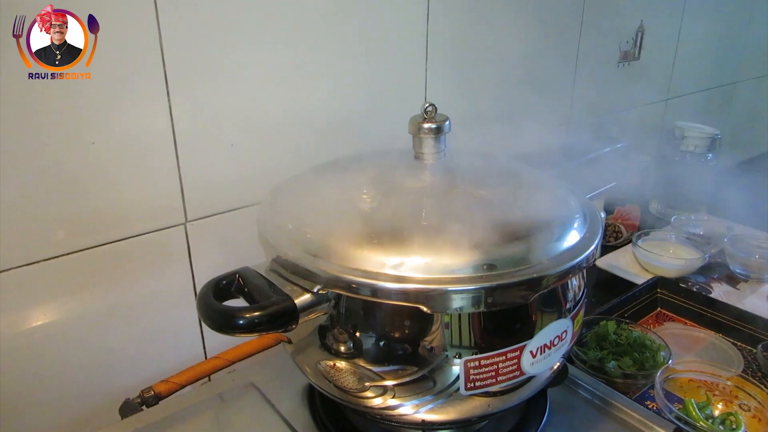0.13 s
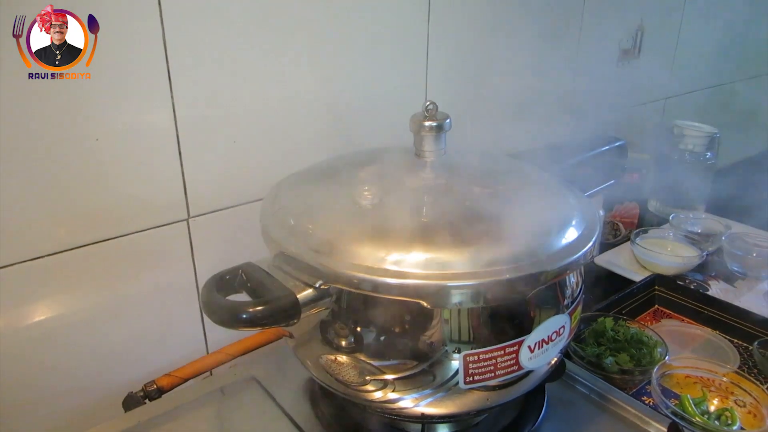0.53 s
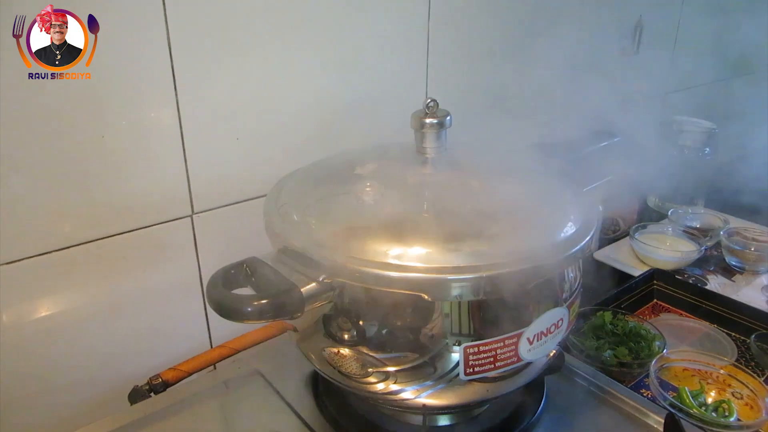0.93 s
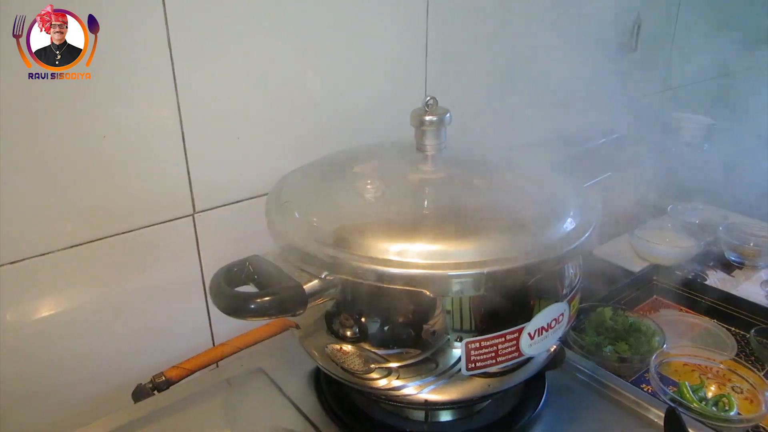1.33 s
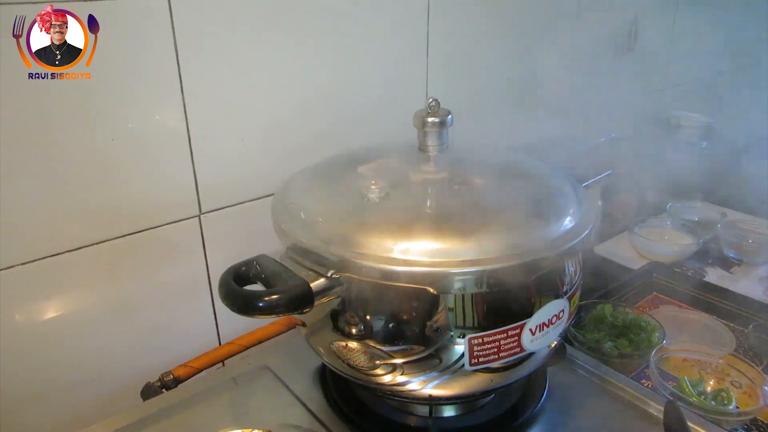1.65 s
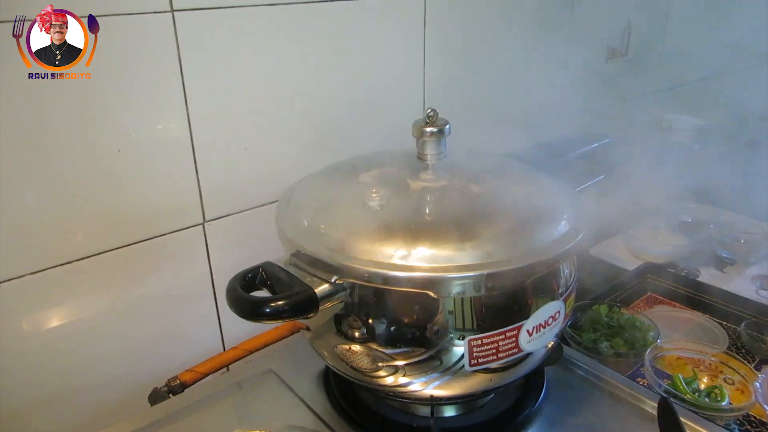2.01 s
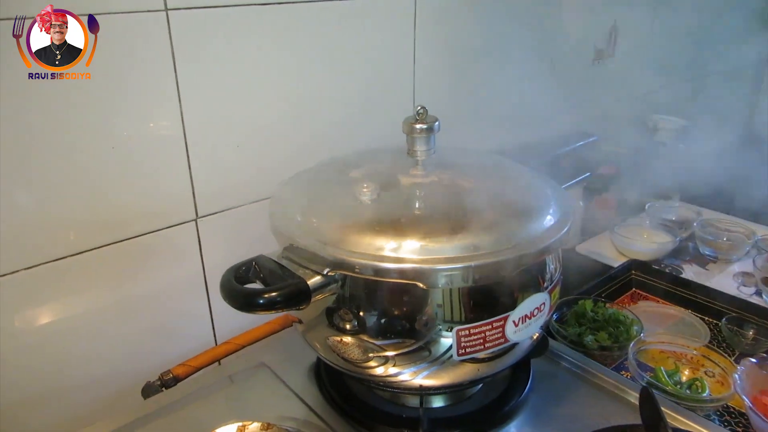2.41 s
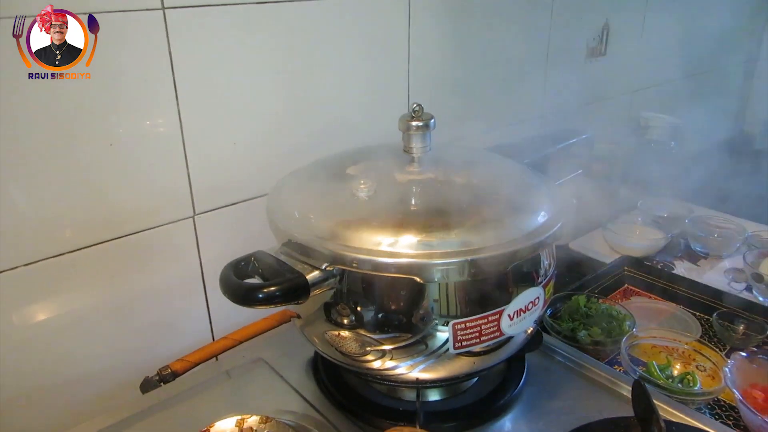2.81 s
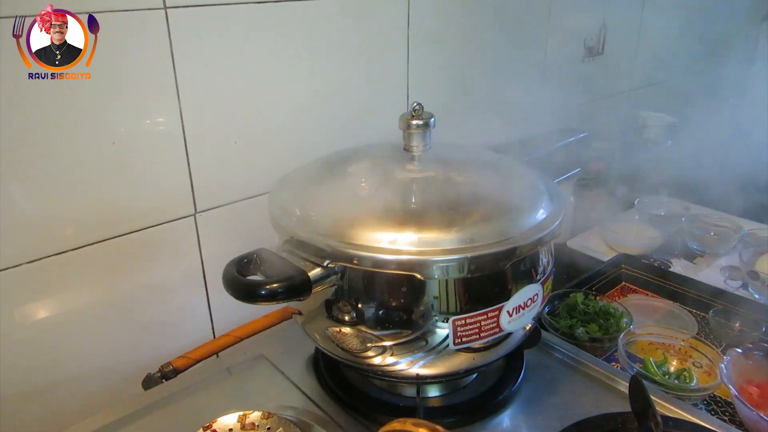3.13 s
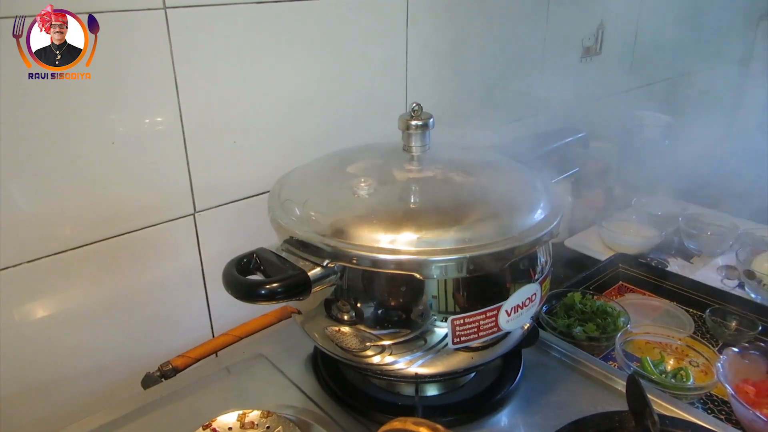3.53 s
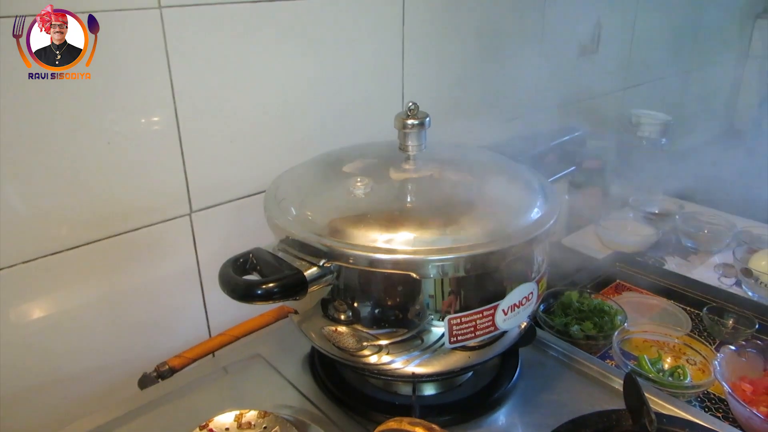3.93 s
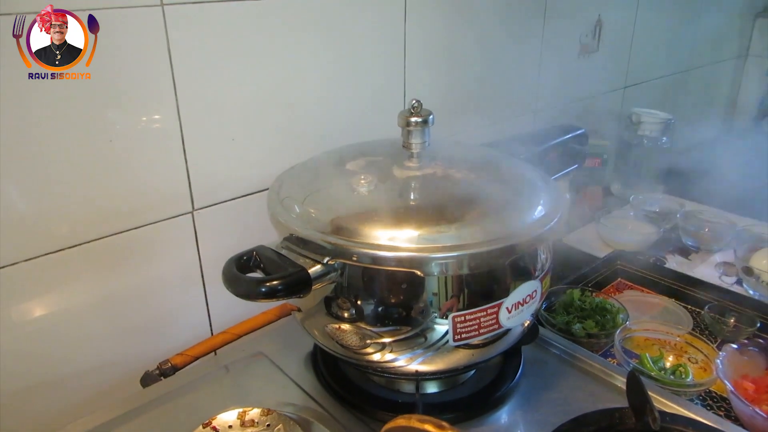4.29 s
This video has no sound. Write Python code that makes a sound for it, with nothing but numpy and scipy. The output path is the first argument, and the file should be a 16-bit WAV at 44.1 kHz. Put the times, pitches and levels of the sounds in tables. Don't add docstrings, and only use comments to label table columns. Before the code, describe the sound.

A pressure cooker vents loud, breathing steam while its low roar calms; early on, a brief harsh scrape overloads the microphone.

```python
import sys
import numpy as np
from scipy import signal
from scipy.fft import rfft, irfft
from scipy.io import wavfile
from scipy.ndimage import uniform_filter1d, minimum_filter1d

SR = 44100
rng = np.random.default_rng(int(sys.argv[2]) if len(sys.argv) > 2 else 0)


def volts_from_db(level):
    exponent = np.asarray(level, float) / 20
    return 10 ** exponent


def pcm_store(signal):
    levels = np.round(np.clip(np.atleast_2d(signal), -1, 1) * 32767)
    wavfile.write(sys.argv[1], SR, levels.astype(np.int16).T)


N = 196669

# frequency in Hz, level in dB per Hz.
JET_COLOUR = [(20, -69), (40, -25), (140, -46), (310, -30), (500, -31), (870, -20), (1360, -18),
              (2180, -12.5), (4650, -5), (6890, -0.5), (10000, -1), (12000, -6.5), (14000, -7.5),
              (15700, -19.5)]
# frequency in Hz, port difference over the sum in dB.
PORT_WIDTH = [(60, -2), (380, -1), (700, -8.5), (1290, -18.5), (2380, -15.5), (4400, -14), (6500, -12),
              (7500, -13)]
# frequency in Hz, width in Hz, lift in dB.
RESONANCES = [(1100, 213, 7.5), (685, 26, 6.5), (2980, 310, -1), (3390, 870, 2.5), (5850, 160, 2.5),
              (6900, 1000, 1.5), (9770, 160, -0.5), (10740, 280, 2.5)]
# time in seconds, chatter pitch in Hz, level in dB.
SCRAPE_PATH = [
    (0.5066, 2302, -5.5),
    (.525, 2400, -8),
    (.535, 1600, -6),
    (0.561, 1603, -6),
    (0.573, 1453, -3.5),
    (0.591, 1648, -3.5),
    (0.622, 1401, -5),
    (0.6337, 744, -2),
]
# time in seconds, length in seconds.
CONTACT_LIFTS = [ (.5142, .0012), (.522, .002), (.5292, .0016), (.557, .002), (.5635, .001), (.5748, .0014),
                 (.5845, .002), (.6078, .004), (.6172, .0012), (.6285, .0016), (.6318, .001)]
# frequency in Hz, level in dB per Hz.
RUB_COLOUR = [(30, -54), (110, -12), (200, -3), (400, -0.5), (700, 6.5), (1500, 5.5), (3000, -15),
              (5000, -10), (9000, -50)]
# time in seconds, length in seconds, jet change in dB.
WEIGHT_MOVES = [(0.417, 0.21, 4), (0.676, 0.54, 0), (1.016, 0.12, -5), (1.183, 0.043, -1.5),
                (1.434, 0.25, -1), (1.565, 0.14, -6), (1.74, 0.085, 1.5), (1.92, 0.13, -6.5),
                (2.042, 0.16, -4), (2.25, 0.17, 1), (2.552, 0.12, -4), (2.773, 0.035, -4.5),
                (2.943, 0.11, -3), (3.113, 0.49, 1.5), (3.593, 0.19, -4), (4.003, 0.18, -0.5),
                (4.239, 0.093, -4), (4.377, 0.082, 2)]
# time in seconds, roar level in dB.
BOIL_ROAR = [(0, 6.5), (.3, 8), (.42, 4), (.72, 10), (.93, -1.5), (1.4, -0.5), (2.2, -2), (2.85, 2.5),
             (3.2, -2.5), (3.9, -1.5), (4.46, -0.5)]

STEAM_DB = -18
BACKUP = 0.78
SWITCHING_HZ = 7580
TOP_HZ = 4600
SNAP = 3.2
GRIP_DB = 0.9
FFT, HOP = 512, 128


def evened(x):
    return x / np.sqrt(np.mean(x ** 2) + 1e-20)


def read(points, hz):
    f, value = np.transpose(points)
    return np.interp(np.log(hz + 1), np.log(f + 1), value)


def drift(length, hz):
    r = np.exp(-2 * np.pi * hz / SR)
    return evened(signal.lfilter([1], [1, -2 * r, r * r], rng.standard_normal(length)))


def kitchen_noise(frames):
    t = np.arange(SR // 4) / SR
    echoes = rng.standard_normal((2, len(t))) * volts_from_db(-60 * t / 0.25)
    echoes /= np.linalg.norm(echoes, axis=1, keepdims=True)
    echoes[:, 0] = volts_from_db(8)
    source = rng.standard_normal((2, frames * HOP + len(t)))
    noise = signal.fftconvolve(source, echoes, "valid", axes=1)
    spectra = signal.stft(noise, nperseg=FFT, noverlap=FFT - HOP, boundary="even")[2]
    return spectra[..., :frames]


def polarity(frames, hz):
    blocks = rng.standard_normal((frames // 8 + 2, len(hz) // 8 + 1)).T
    blocks = evened(blocks + 0.8 * np.roll(blocks, 1, axis=1) + 0.55 * np.roll(blocks, 1, axis=0))
    lean = np.interp(hz[::8], [7550, 11560, 12870, 15500], [-0.61, 0.18, 1.0, 1.0])[:, None]
    flips = np.tanh(8.6 * (blocks + lean))
    flips = flips.repeat(8, axis=0).repeat(8, axis=1)
    return 23.7 * uniform_filter1d(flips[:len(hz), :frames], size=3, axis=1)


def chatter_pitch(t):
    s, hz, _ = np.transpose(SCRAPE_PATH)
    pitch = np.interp(t, s, hz) * np.exp(0.9 * np.tanh(0.7 * drift(len(t), hz=700)))
    for at, length in CONTACT_LIFTS[:-2]:
        since = t - at - length / 2
        pitch *= 1 + 0.9 * (since > 0) * np.exp(-abs(since) / 0.0012)
    return TOP_HZ * np.tanh(pitch / TOP_HZ)


def release_thump(end):
    after = np.maximum(np.arange(N) / SR - end, 0)
    onset = np.minimum(after / 0.0006, 1)
    return -volts_from_db(-16.5) * onset * (np.exp(-after / 0.005) - 0.35 * np.exp(-after / 0.022))


def scrape():
    s, _, level_db = np.transpose(SCRAPE_PATH)
    t = np.arange(s[0], s[-1], 1 / SR)
    turns = 2 * np.pi * np.cumsum(chatter_pitch(t)) / SR
    pointed = np.arcsin(0.97 * np.sin(turns))

    rub_gain = volts_from_db(read(RUB_COLOUR, np.fft.rfftfreq(len(t), 1 / SR)))
    rub = irfft(rfft(rng.standard_normal(len(t))) * rub_gain, len(t))
    drive = pointed + volts_from_db(-10) * evened(rub)

    swing = np.tanh(0.24 * drive)
    swing = swing + SNAP * np.gradient(swing * abs(swing))
    swing *= volts_from_db(GRIP_DB * drift(len(t), hz=350))
    for at, length in CONTACT_LIFTS:
        swing *= 1 - 0.75 * np.exp(-(2 * (t - at) / length) ** 4)
    swing = signal.lfilter(*signal.butter(1, 220, "high", fs=SR), swing)

    out, start = np.zeros(N), round(s[0] * SR)
    level = volts_from_db(np.interp(t, s, level_db)) * signal.windows.tukey(len(t), 0.012)
    out[start:start + len(t)] = evened(swing) * level
    return out + release_thump(s[-1])


def steam():
    frames, hz = N // HOP + 5, np.fft.rfftfreq(FFT, 1 / SR)
    t = np.arange(frames) * HOP / SR
    tall = hz[:, None]
    jet_db = sum(db * np.exp(-(2 * (t - s) / length) ** 2) for s, length, db in WEIGHT_MOVES)
    roar_db = np.interp(t, *np.transpose(BOIL_ROAR)) - BACKUP * jet_db
    low = 1 / (1 + (tall / 1900) ** 4)
    surge_db = (1 - low) * (jet_db - jet_db.mean()) + low * (roar_db - roar_db.mean())

    eddies = rng.standard_normal((frames, len(hz))).T
    eddies = uniform_filter1d(eddies, size=8, axis=0)
    eddies = evened(uniform_filter1d(eddies, size=20, axis=1))
    eddy_db = 0.84 + 0.74 * low + 3.0 / (1 + (tall / 400) ** 2)
    flutter = evened(uniform_filter1d(rng.standard_normal(frames), size=5))

    ringing_db = sum(db / (1 + (2 * (hz - f) / w) ** 2) for f, w, db in RESONANCES)
    colour_db = read(JET_COLOUR, hz) + ringing_db
    field = volts_from_db(colour_db[:, None] + surge_db + eddy_db * eddies + 0.5 * flutter)

    same, other = kitchen_noise(frames)
    wide = volts_from_db(np.where(tall < SWITCHING_HZ, read(PORT_WIDTH, hz)[:, None], polarity(frames, hz)))
    z = np.array([same, other * wide]) * field / np.sqrt(1 + wide ** 2)
    both, apart = signal.istft(z, nperseg=FFT, noverlap=FFT - HOP)[1][:, :N]
    ports = np.array([both + apart, (both - apart) * volts_from_db(1.33)])
    return volts_from_db(STEAM_DB) * evened(ports)


def scene():
    return steam() + scrape()


def roll_off(x):
    return signal.sosfilt(signal.butter(12, 15630, fs=SR, output="sos"), x)


def record(dry):
    hold = round(0.14 * SR)
    power = signal.lfilter(np.ones(441) / 441, 1, (dry ** 2).mean(0))
    over_db = np.maximum(10 * np.log10(power + 1e-12) + 14.73, 0)
    held_db = -minimum_filter1d(-over_db, hold | 1, origin=hold // 2)
    fall = np.arange(N) * 95.0 / SR
    held_db = np.maximum.accumulate(held_db + fall) - fall
    r = np.exp(-1 / (0.02 * SR))
    ducked = dry / volts_from_db(0.82 * signal.lfilter([1 - r], [1, -r], held_db))
    ducked = 0.8 * np.tanh(ducked / 0.8)
    return roll_off(ducked)


dry = scene()
out = record(dry)
pcm_store(out)
```